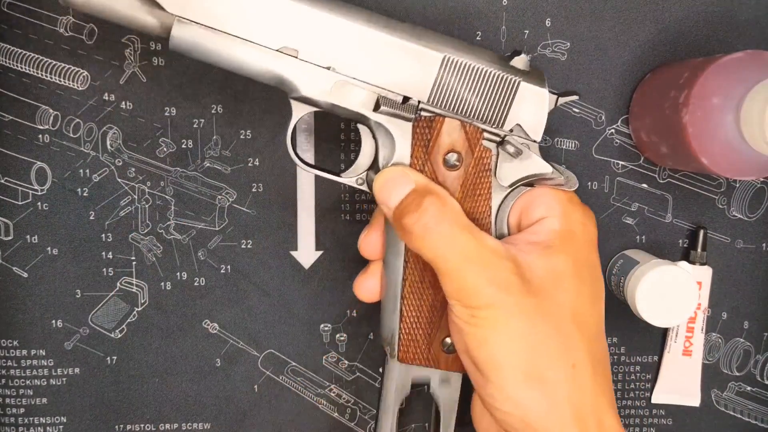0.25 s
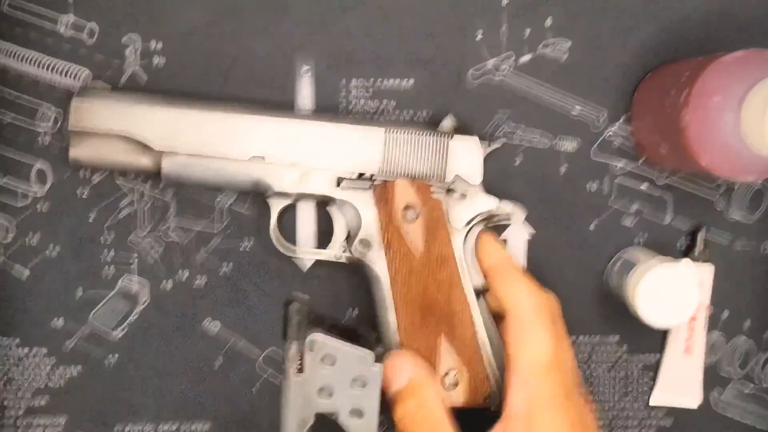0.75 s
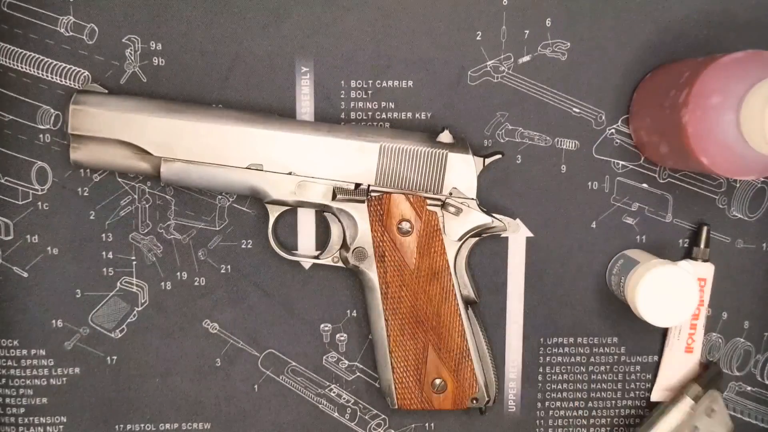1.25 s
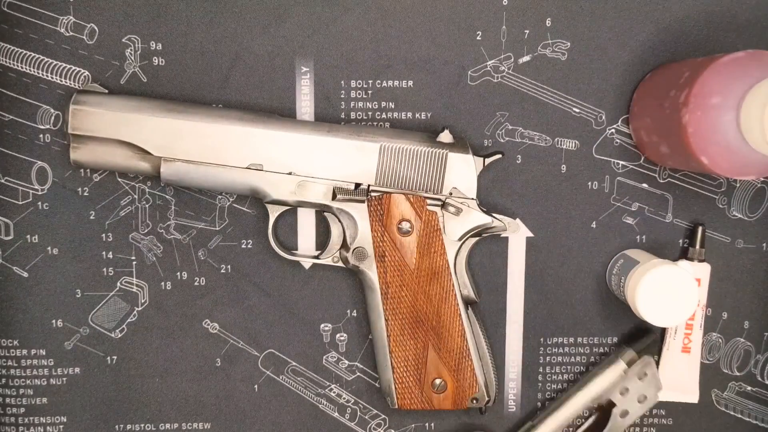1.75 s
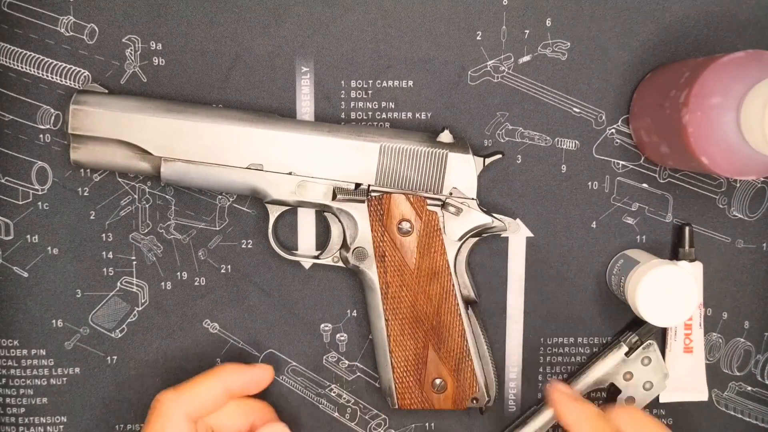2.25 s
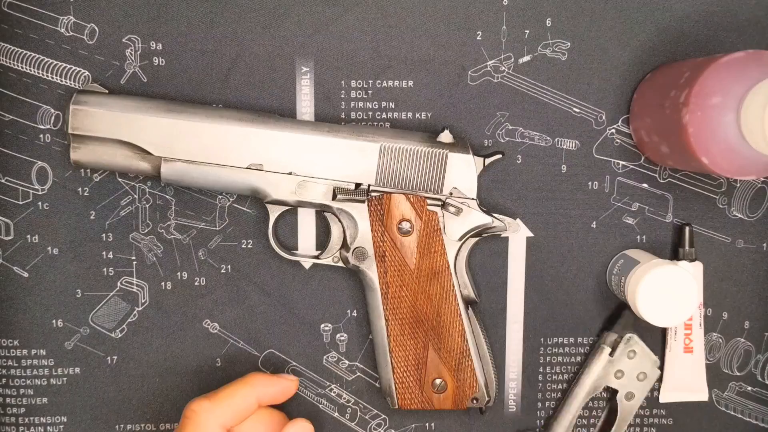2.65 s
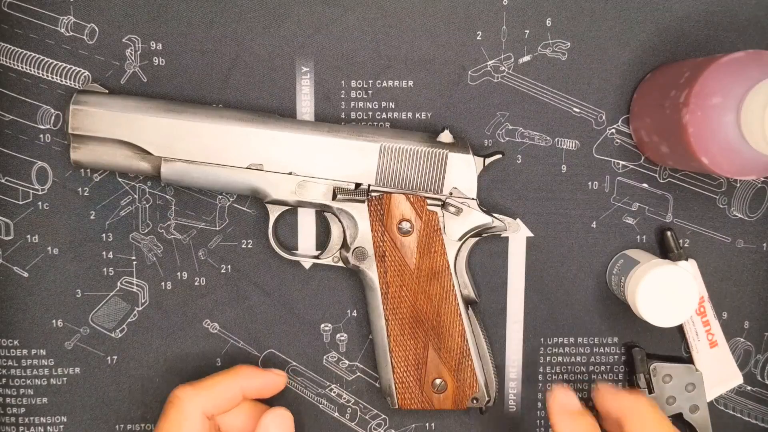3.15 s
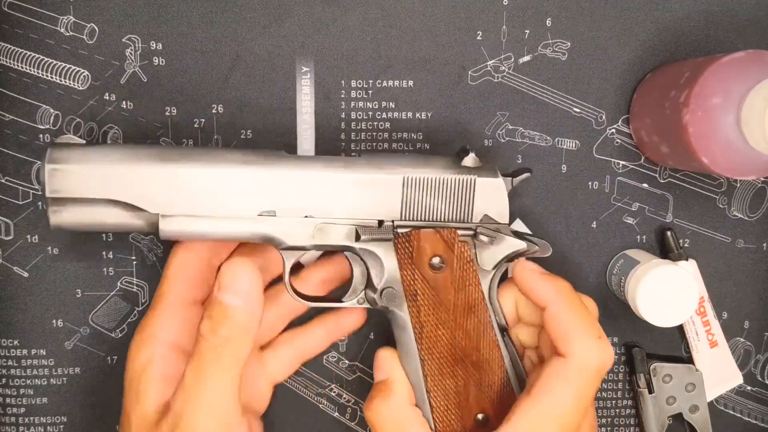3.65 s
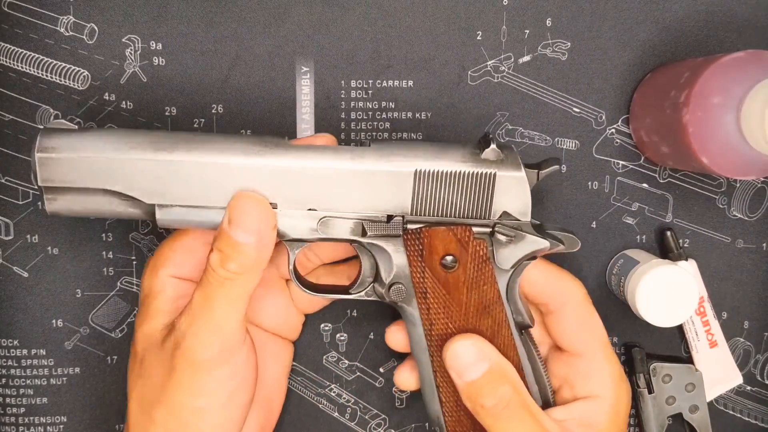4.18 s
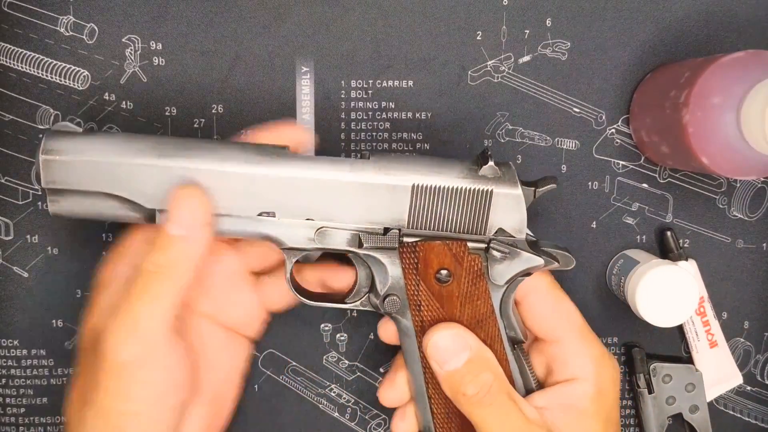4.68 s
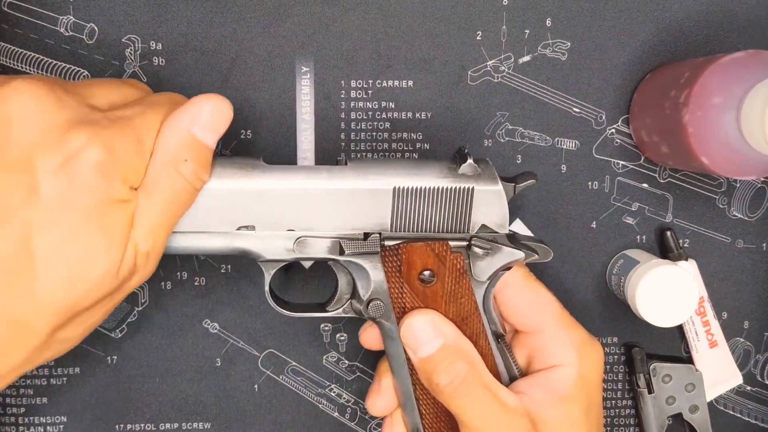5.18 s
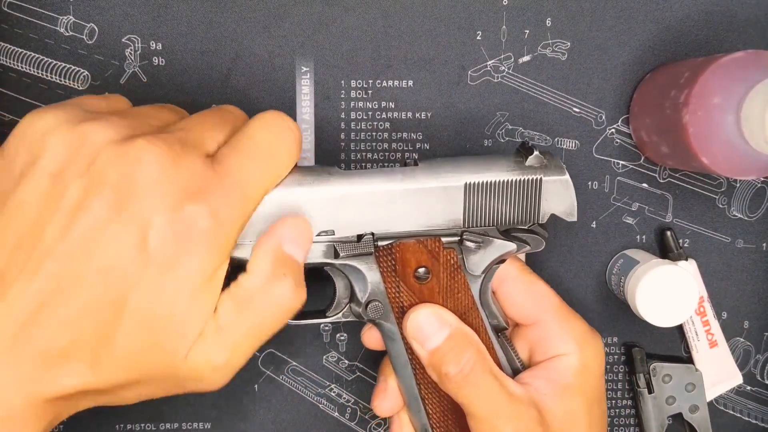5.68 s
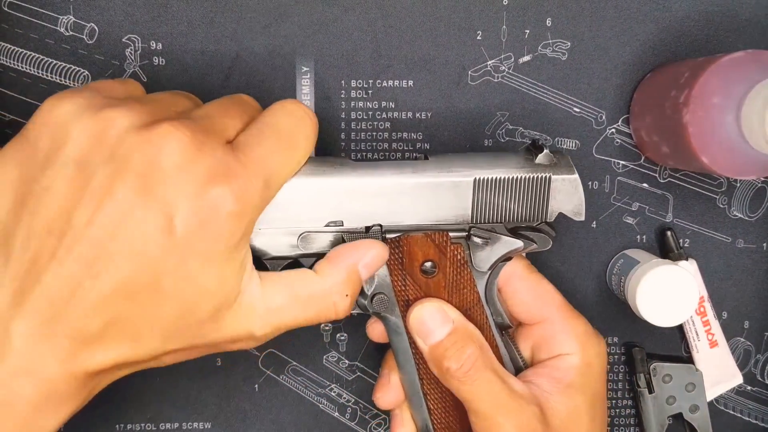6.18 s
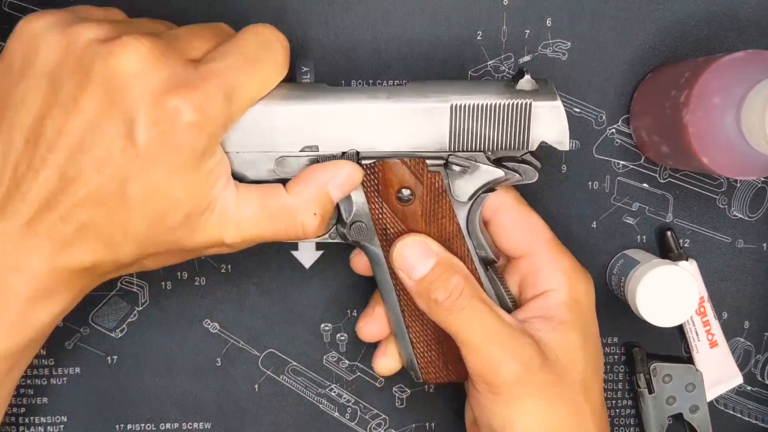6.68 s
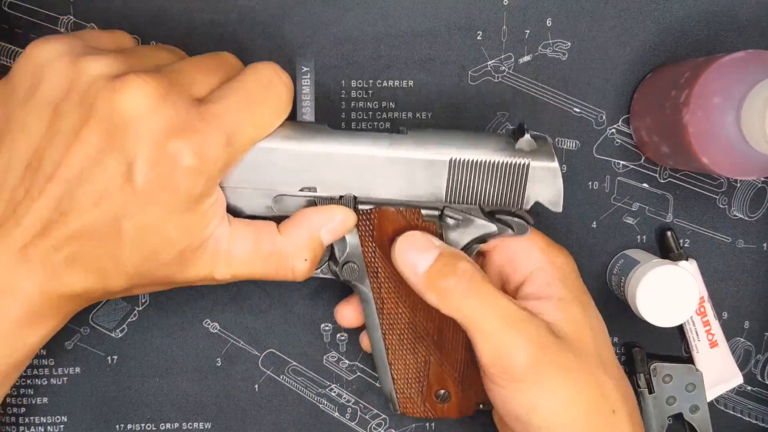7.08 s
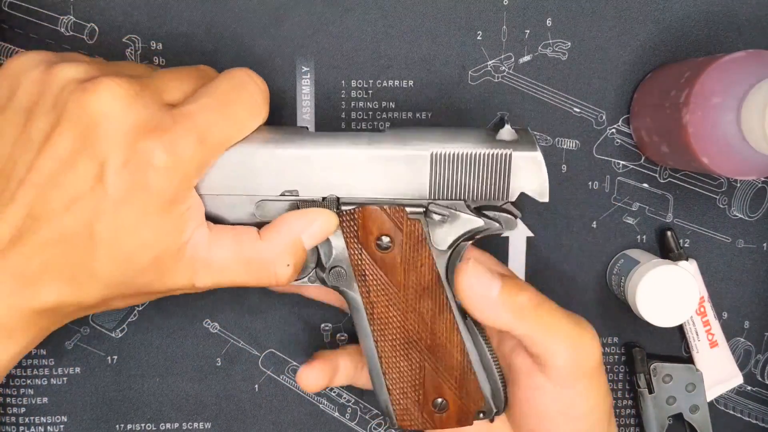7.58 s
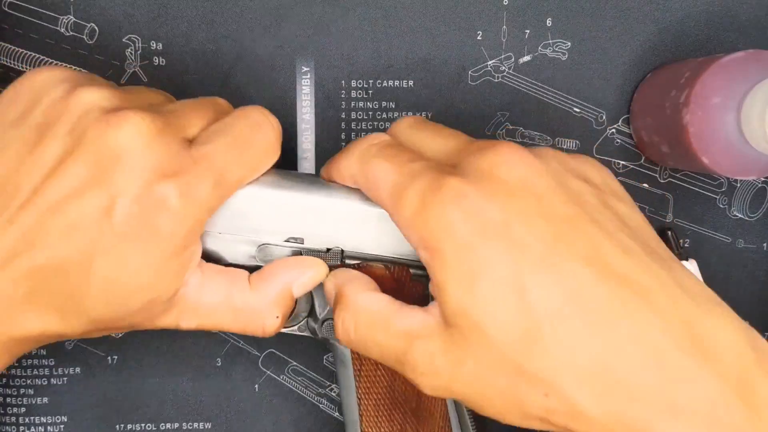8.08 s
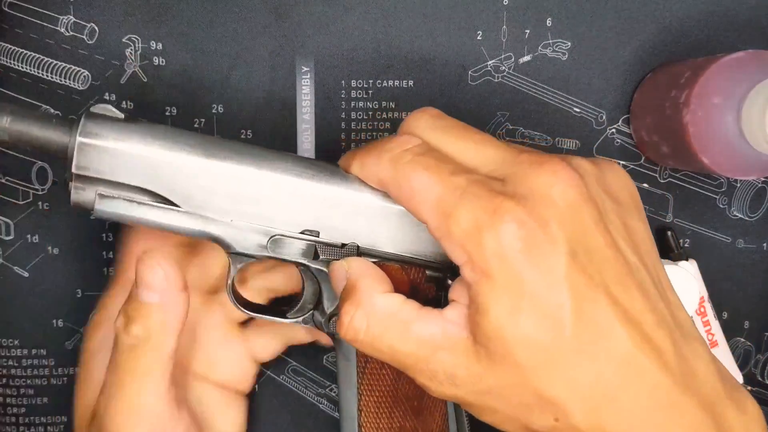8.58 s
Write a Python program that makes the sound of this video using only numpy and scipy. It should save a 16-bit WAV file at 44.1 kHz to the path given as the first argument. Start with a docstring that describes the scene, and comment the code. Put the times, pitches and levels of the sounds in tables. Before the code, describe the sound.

A magazine scrapes out of a steel air pistol, both thump hollowly onto a matted table, then sharp slide clicks snap over low room hum.

```python
"""Taking a steel air pistol apart

Hands work over a mat on a table, close by in a small, dry room. The magazine scrapes out, pistol and
magazine land with hollow thumps, and slide and catches click sharply; skin brushes over a low room hum.
Hum, scrape and skin are shaped noise; snaps are short noise bursts; table and steel ring as sums of sines."""
import sys
import numpy as np
from scipy import signal
from scipy.fft import rfft, irfft, next_fast_len
from scipy.io import wavfile
from scipy.ndimage import map_coordinates

SR = 44100
rng = np.random.default_rng(int(sys.argv[2]) if len(sys.argv) > 2 else 0)


def waveform_to_disk(signal):
    """Save audio, clipped to [-1, 1], as 16-bit WAV at the path in sys.argv[1]."""
    frames = np.transpose(np.atleast_2d(signal))
    scaled = np.clip(frames, -1, 1) * 32767
    samples = np.round(scaled).astype(np.int16)
    wavfile.write(sys.argv[1], SR, samples)


N = 389844
LEAD_S = 0.006  # surfaces graze for this long before a contact is loudest


def amp(db):
    """Turn decibels into a gain."""
    return 10 ** (np.asarray(db) / 20)


def unit(x):
    """Scale to an rms (average strength) of 1."""
    return x / np.sqrt(np.mean(x ** 2) + 1e-20)


def along(points, hz):
    """Read a curve of (f/Hz, value) points, with frequency on a log axis."""
    f, value = np.transpose(points)
    return np.interp(np.log(hz + 1), np.log(f + 1), value)


def curve(points):
    """Draw straight lines between (t/s, value) points, one value per sample."""
    s, value = np.transpose(points)
    return np.interp(np.arange(N) / SR, s, value)


def wobble(rate):
    """A smooth random curve through `rate` random points a second."""
    knots = rng.standard_normal(int(N * rate / SR) + 4)
    return map_coordinates(knots, [np.arange(N) * rate / SR])


def filtered(x, gain):
    """Multiply the spectrum of x by a gain that depends on frequency."""
    size = next_fast_len(N + SR // 4)
    spectrum = rfft(x, size) * gain(np.fft.rfftfreq(size, 1 / SR))
    return irfft(spectrum, size)[..., :N]


def pair(alike, size):
    """Left and right white noise; alike = 1 makes both sides the same, 0 unrelated."""
    mid, side = rng.standard_normal((2, size))
    turn = np.arccos(np.clip(alike, -1, 1)) / 2
    return np.cos(turn) * mid + np.sin(turn) * np.array([side, -side])


def rush(spectrum, alike):
    """Steady stereo noise with the given spectrum, at rms 1."""
    return unit(filtered(pair(alike, N), lambda hz: amp(along(spectrum, hz))))


def causal(x, gain, size=2048):
    """Filter x in minimum phase, so that the filter smears no sound ahead of a blow."""
    log_gain = np.log(np.maximum(gain(np.fft.rfftfreq(size, 1 / SR)), 1e-5))
    cepstrum = irfft(log_gain)
    # folding the second half onto the first gives the minimum-phase response
    cepstrum[1:size // 2] *= 2
    cepstrum[size // 2 + 1:] = 0
    response = irfft(np.exp(rfft(cepstrum)))
    return signal.fftconvolve(x, response[None], axes=1)[:, :x.shape[1]]


def crack(t, t60, alike, rise_s=0.008):
    """A contact as noise of energy 1: it climbs 60 dB per rise_s, then falls 60 dB per t60."""
    late = t - LEAD_S
    burst = pair(alike, len(t)) * amp(-60 * np.maximum(late / t60, -late / rise_s))
    return burst / np.sqrt(np.sum(burst ** 2) / 2)


def ring(modes, t, blur_hz=70):
    """Ringing metal, with new mode strengths each blow; loose, touching parts blur its pitch."""
    hz, db, t60 = np.transpose(modes)[:, :, None]
    strength = amp(db + rng.normal(0, 3.3, (2, len(modes), 1)) - 60 * t / t60)
    steps = rng.standard_normal((2, len(modes), len(t)))
    drift = np.cumsum(steps, axis=2) * np.sqrt(2 * np.pi * blur_hz / SR)
    return np.sum(strength * np.sin(2 * np.pi * hz * t + drift), axis=1)


def add(track, s, sound):
    """Mix a sound into the track at s seconds."""
    part = track[:, max(round(s * SR), 0):][:, :sound.shape[-1]]
    part += sound[..., :part.shape[1]]


# slow changes of the room hum: (t/s, level/dB), relative
HUM_LEVEL = [(0.0, -69.5), (3.2, -69), (3.72, -72), (4.13, -73), (5.1, -75.5), (8.84, -74)]
# colour of the room hum: (f/Hz, level/dB), relative, per Hz
HUM_SPECTRUM = [(15, -74), (25, -33.5), (32, -34), (59, -11.5), (91, -11.5), (129, 1.5), (153, -4.5),
                (188, -11.5), (281, -13.5), (317, -22.5), (409, -16.5), (450, -26), (580, -56.5),
                (990, -120)]
# narrow peaks that make up the whir: (f/Hz, width/Hz, level/dB), relative
WHIR_PEAKS = [(534, 80, -0.5), (747, 102, -1), (983, 31, -3), (1241, 130, -7), (1513, 74, 1),
              (1738, 410, -4.5), (2033, 63, -4)]
# the whir swells and fades: (t/s, level/dB), relative
WHIR_LEVEL = [(0.0, -74), (1.33, -83), (3.49, -70.5), (4.18, -86), (5.22, -75.5), (5.32, -74),
              (7.21, -73.5), (8.84, -82.5)]
# colour of the even hiss: (f/Hz, level/dB), relative, per Hz
HISS_SPECTRUM = [(210, -42.5), (350, -6.5), (458, -23.5), (529, -12.5), (660, -12.5), (738, -7),
                 (906, -13.5), (981, -5.5), (1370, -9), (1550, -9.5), (2270, -17.5), (3490, -14.5),
                 (4030, -18), (5500, -18.5), (7000, -14.5), (8800, -20), (10500, -15.5), (12000, -21),
                 (15500, -22.5)]


def background(hum_db=4, whir_db=3.0, hiss_db=-71, waver_db=1.92):
    """Three shaped noises: a wavering low hum, a faint whir that swells and fades, and an even hiss."""
    hum_level = curve(HUM_LEVEL) + hum_db + waver_db * wobble(10)
    hum = amp(hum_level) * rush(HUM_SPECTRUM, alike=0.87)

    def peaks(hz):
        """Each peak falls to half its height at half its width to either side."""
        return sum(amp(db) / (1 + (2 * (hz - centre) / width) ** 2) for centre, width, db in WHIR_PEAKS)

    whir_level = curve(WHIR_LEVEL) + whir_db + 1.35 * wobble(5)
    whir = amp(whir_level) * unit(filtered(pair(0.23, N), peaks))
    return hum + whir + amp(hiss_db) * rush(HISS_SPECTRUM, alike=0.5)


# how long the room's echo takes to fall 60 dB: (f/Hz, t60/s)
ROOM_DECAY = [(200, 0.18), (1500, 0.099), (5000, 0.12), (14000, 0.1)]


def room(x, gap_s=0.0022):
    """The small room's short tail: fading noise after a gap, unrelated at the two microphones."""
    hz, t, grains = signal.stft(rng.standard_normal((2, SR // 4)), SR, nperseg=256)
    fading = grains * amp(-60 * t / along(ROOM_DECAY, hz)[:, None])
    tail = signal.istft(fading, SR, nperseg=256)[1]
    tail = np.pad(tail / np.linalg.norm(tail[0]), ((0, 0), (round(gap_s * SR), 0)))
    return signal.fftconvolve(x, tail, axes=1)[:, :N]


# colour of skin sliding over mat and steel: (f/Hz, level/dB), relative, per Hz
SKIN_SPECTRUM = [(400, -21), (1000, -1), (2000, 0), (4000, 1), (7000, -0.5), (10000, 0.5), (13000, -4),
                 (15500, -2)]
# strokes of the skin: (t/s, length/s, level/dB), relative
STROKES = [(0.567, 0.35, -64), (1.536, .17, -67.5), (2.586, 0.28, -63.5), (2.862, 1.23, -71.5),
           (3.342, 0.3, -64.5), (4.57, 0.11, -66.5), (4.79, 0.13, -71.5), (5.298, 0.12, -56),
           (6.826, 0.092, -71.5), (6.997, 0.045, -66), (7.32, .085, -66), (7.589, 0.091, -63.5),
           (8.187, 0.51, -78.5)]


def rubbing(grain_db=2.0, edge_s=0.029, fade_db=5, level_db=1.5):
    """Each stroke is a soft, fine-grained hiss, strongest midway where the hand slides fastest."""
    t, pressure = np.arange(N) / SR, np.zeros(N)
    for s, length, db in STROKES:
        touch = np.clip(np.minimum(t - s, s + length - t) / edge_s + 0.5, 0, 1)
        place = np.clip(2 * (t - s) / length - 1, -1, 1)  # -1 at the start, 0 midway, 1 at the end
        pressure += touch * amp(db + level_db - fade_db * place ** 2)
    grain = amp(grain_db * wobble(250) + 0.41 * wobble(54))
    return pressure * unit(rush(SKIN_SPECTRUM, alike=0.41) * grain)


# fingers bump on the grip: (t/s, level/dB, tone as a multiple of the usual frequencies), level relative
BUMPS = [(2.253, -27, 0.75), (2.803, -28, 0.89), (3.226, -26, 0.93), (3.565, -28.5, 0.93),
         (4.232, -31, 0.92), (4.894, -27.5, 1.0), (7.56, -29.5, 1), (7.966, -26, 0.41), (8.219, -33, 1)]


def fingers():
    """Soft fingertips bump on the grip: dull noise bursts whose colour moves up or down with the tone."""
    out, t = np.zeros((2, N)), np.arange(SR // 6) / SR
    soft = [(200, -17.5), (700, 4), (2000, 4.5), (2800, -18.5), (9000, -32)]  # (f/Hz, level/dB)
    for s, db, tone in BUMPS:
        touch = crack(t, t60=0.059, alike=1.0, rise_s=0.027)
        bump = causal(touch, lambda hz: amp(along(soft, hz / tone)))
        add(out, s - LEAD_S, amp(db) * bump)
    return out


def snap(t, lowest_hz, treble_db, t60, rattle_db, core_t60=0.0045, skirt_hz=14000):
    """Steel on steel, a hard core and brief rattle; fades below its lowest resonance, gentler if that is high."""
    hardness = [(1600, 2.5), (2100, -2.5), (3600, 0), (5000, -2.0),
                (7000, 0.49 * treble_db + 1.5), (10000, 0.54 * treble_db - 0.5),
                (13000, treble_db + 7.0), (16000, treble_db - 0.5)]  # (f/Hz, level/dB)
    steepness = np.clip(skirt_hz / lowest_hz, 2, 8)

    def colour(hz):
        """Shape the treble and remove most of what lies below the lowest resonance."""
        leak = 0.025 * np.minimum(hz / lowest_hz, 1)
        cutoff = leak + 1 / np.hypot(1, (lowest_hz / (hz + 1)) ** steepness)
        return amp(along(hardness, hz)) * cutoff

    core = crack(t, core_t60, alike=0.2, rise_s=0.54 * core_t60)
    rattle = amp(rattle_db) * crack(t, t60, alike=0.37, rise_s=0.5 * t60)
    return causal((core + rattle) / np.hypot(1, amp(rattle_db)), colour)


# the magazine slides inside the grip: (t/s, length/s, friction level/dB), relative
SLIDES = [(0.092, 0.027, -40), (0.172, 0.069, -42), (.71, 0.006, -40.5)]
# colour of the friction: (f/Hz, level/dB), relative, per Hz
SCRAPE_SPECTRUM = [(180, -65.5), (300, -17.5), (404, -28), (720, -15.5), (1160, -8), (1490, -0.5),
                   (2740, -11), (3570, -5.5), (3750, -10), (10800, -13), (15500, -31)]
# the magazine catches on the way out: (t/s, level/dB, treble level/dB), relative
CATCHES = [(.0975, 0.5, -28.5), (.1035, -8, -39), (.114, -7, -20), (0.1508, -3.5, -33), (.162, -5.5, -48),
           (.169, -9.5, -40), (.191, -11, -12), (0.2188, -7.5, -13.5), (.716, 1.5, -52)]
GRAB_DB_PER_S, RELEASE_DB_PER_S = 1900, 750  # how fast friction builds and dies


def scrape(rough_db=4, level_db=-2, slips_per_s=700):
    """The magazine slips along inside the grip, tiny ticks over a rough hiss, and catches with dull snaps."""
    t, friction = np.arange(N) / SR, np.zeros(N)
    for s, length, db in SLIDES:
        before = np.maximum(s - t, 0)
        after = np.maximum(t - s - length, 0)
        friction += amp(db - GRAB_DB_PER_S * before - RELEASE_DB_PER_S * after)
    ticks = unit(pair(0.294, N) * (rng.random(N) < slips_per_s / SR))
    hiss = unit(pair(0.77, N) * amp(rough_db * wobble(450)))
    grating = unit(filtered(ticks + hiss, lambda hz: amp(along(SCRAPE_SPECTRUM, hz))))
    out = amp(level_db) * friction * grating
    for s, db, treble_db in CATCHES:
        catch = snap(t[:SR // 6], lowest_hz=1176, treble_db=treble_db, t60=0.019, rattle_db=-3)
        add(out, s - LEAD_S, amp(db) * catch)
    return out


# ringing modes of the table top: (f/Hz, level/dB, t60/s), level relative
TABLE_MODES = [(122, -0.5, 0.096), (152.6, -8, 0.21), (210, -4, 0.15), (271.7, 2, 0.12), (354, -20, 0.16),
               (401, 1, 0.071), (430.2, 4.5, 0.076), (489.6, -3, 0.11), (547, -4.5, 0.093), (582, -14, 0.2),
               (817, 3.5, 0.057)]


def thump(t, pitch_hz, octaves=0.47, swell_cycles=1.6, spread_db=-18):
    """Table modes near the blow's pitch swell over a few cycles, the low ones slowest; peak 1."""
    hz, db, t60 = np.transpose(TABLE_MODES)[:, :, None]
    reach = amp(spread_db) + np.exp(-(np.log2(hz / pitch_hz) / octaves) ** 2)
    swell = 1 - np.exp(-(t * hz / swell_cycles) ** 2)
    boom = np.sum(reach * amp(db - 60 * t / t60) * swell * np.sin(2 * np.pi * hz * t), axis=0)
    return boom / np.max(np.abs(boom))


def sway(t, swell_s=0.0122):
    """The whole table rocks under a blow: four low modes that swell and die away."""
    modes = [(72.7, -7, 0.58), (93.5, -4.0, 0.16), (122.5, 2, 0.27), (160.3, 9.5, 0.12)]  # (f/Hz, level/dB, t60/s)
    rocking = sum(amp(db - 60 * t / t60) * np.sin(2 * np.pi * hz * t) for hz, db, t60 in modes)
    return rocking * (1 - np.exp(-(t / swell_s) ** 2))


# a part meets the table: (t/s, part, thump level/dB, pitch f/Hz, clack level/dB, steel tick level/dB), relative
KNOCKS = [(.491, "pistol", -53, 133, -44.5, -55), (.719, "pistol", -28.5, 237, -29, -34),
          (.86, "pistol", -36.5, 265, -46.5, -54.5), (1.211, "magazine", -42.5, 383, -44, -57),
          (1.501, "magazine", -47, 280, -49.5, -58), (1.541, "magazine", -49.5, 126, -52, -78),
          (1.704, "magazine", -40.5, 282, -36, -54), (1.78, "magazine", -23, 456, -29.5, -44),
          (1.8049, "magazine", -23.5, 320, -33.5, -50), (1.823, "magazine", -45.5, 256, -44.5, -49),
          (2.313, "magazine", -54, 124, -50, -83), (2.336, "magazine", -48, 297, -57.5, -67),
          (2.897, "pistol", -62, 136, -51.5, -62), (3.208, "pistol", -59.5, 274, -52.5, -79)]
# ringing modes of the magazine's shell: (f/Hz, level/dB, t60/s), level relative
SHELL_MODES = [(3050, -7, 0.048), (4970, -12, 0.16), (7500, -6, 0.088), (10300, -6, 0.13),
               (12900, -6, 0.052), (14180, -23, .11)]
SWAY_DB = {"pistol": -11, "magazine": -27}  # beside the thump column: the heavier part rocks the table more
SHELL_RING_DB = -4  # the magazine's ring beside the steel tick column


def knocks(thump_db=1, hard_db=31, tick_db=22):
    """A part lands on the mat: steel tick, dull clack, table thump and sway; the hollow magazine rings."""
    clacks, thumps, t = np.zeros((2, N)), np.zeros((2, N)), np.arange(SR // 3) / SR
    dull = [(150, -13), (500, -9), (850, -3.5), (1900, -0.5), (2800, -14.5),
            (5000, -14.0), (8000, -48), (15000, -43.5)]  # (f/Hz, level/dB)
    for s, part, db, pitch_hz, clack_db, steel_db in KNOCKS:
        contact = crack(t, t60=0.016, alike=1.0, rise_s=0.007)
        clack = amp(clack_db + hard_db) * causal(contact, lambda hz: amp(along(dull, hz)))
        tick = amp(steel_db + tick_db) * crack(t, t60=0.017, alike=0.18, rise_s=0.0055)
        add(clacks, s - LEAD_S, clack + tick)
        add(thumps, s, amp(db + thump_db) * thump(t, pitch_hz))
        add(thumps, s, amp(db + SWAY_DB[part]) * sway(t))
        if part == "magazine":
            add(clacks, s, amp(steel_db + SHELL_RING_DB) * ring(SHELL_MODES, t))
    return clacks, thumps


# steel snaps on steel: (t/s, level/dB, lowest resonance f/Hz, treble level/dB), levels relative
CLICKS = [(.719, -3, 1230, -12), (0.7499, -0.5, 2890, -28.5), (1.123, -43, 2470, 9),
          (2.0845, -13, 3140, -20.5), (3.731, -10, 1800, -14.5), (3.99, -28.5, 4500, -28),
          (4.044, -25, 4770, -22), (4.1512, -34.5, 2850, -19), (4.7614, -17, 1120, -7),
          (4.8257, -22, 5000, -11), (4.8684, -22, 1380, -17), (4.9937, -24, 5000, -26),
          (5.157, -22.5, 2300, -8.5), (5.1775, -10.5, 3320, -5.5), (5.27, -22.5, 1360, -4.5),
          (5.3471, 5.5, 1730, -5.5), (5.9, -33.5, 3870, -4), (6.2122, -0.5, 4240, -4.5),
          (6.7084, -30, 2530, -9.5), (6.8492, -26.5, 4970, -12.5), (7.013, -38.5, 2150, -1),
          (8.316, -26.5, 2580, -26), (8.435, -23.5, 3100, -8.5), (8.493, -23, 800, -9.5)]
# ringing modes of the pistol's frame: (f/Hz, level/dB, t60/s), level relative
FRAME_MODES = [(3160, -16, 0.048), (3280, 6.5, 0.012), (3350, 1, 0.035), (3387, 2.5, 0.016),
               (4200, -31, 0.056), (4760, -14.5, 0.051), (5800, -18, .06), (10700, -21, 0.062)]
LOOSE_FROM_S, LOOSE_TO_S = 0.717, 3.5  # no hand grips the frame between these times
FRAME_RING_DB = -31.5  # the frame's ring beside the click's level


def clicks():
    """The slide and its catches snap; the frame rings along while no hand damps it."""
    out, t = np.zeros((2, N)), np.arange(SR // 6) / SR
    for s, db, lowest_hz, treble_db in CLICKS:
        click = snap(t, lowest_hz, treble_db, t60=0.025, rattle_db=-5)
        add(out, s - LEAD_S, amp(db) * click)
        if LOOSE_FROM_S < s < LOOSE_TO_S:
            add(out, s, amp(db + FRAME_RING_DB) * ring(FRAME_MODES, t))
    return out


def from_right(x, right_db, lag_s):
    """A source on the right reaches the left microphone later and weaker."""
    side = np.array([[-1], [1]])  # left, right
    return filtered(x, lambda hz: amp(right_db * side) * np.exp(1j * np.pi * hz * lag_s * side))


def scene(handling_room_db=-4, table_room_db=-17, radiate_hz=60):
    """The work happens a little right of the microphones, with the room's echo and the background."""
    clacks, thumps = knocks()
    handling = from_right(clicks() + clacks + scrape() + fingers(), right_db=1.55, lag_s=0.00007)
    # the table top is too small to radiate the deepest bass
    highpass = signal.butter(2, radiate_hz, "highpass", fs=SR, output="sos")
    table = from_right(signal.sosfilt(highpass, thumps), right_db=1.6, lag_s=0.00009)
    echo = room(amp(handling_room_db) * handling + amp(table_room_db) * table)
    soft_layers = (rubbing() + background()) * amp([[-0.8], [0.8]])  # slightly louder on the right
    return handling + table + echo + soft_layers


def record(dry, top_hz=15900):
    """The microphones pass nothing above their band limit; the edge is 300 Hz wide."""
    return filtered(dry, lambda hz: np.clip((top_hz - hz) / 300 + 0.5, 0, 1))


dry = scene()
out = record(dry)
waveform_to_disk(out)
```